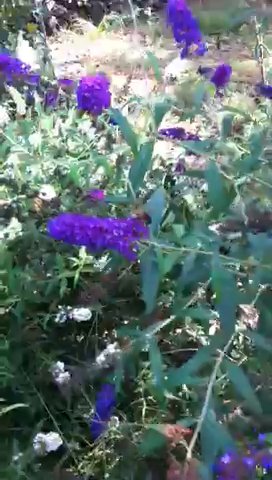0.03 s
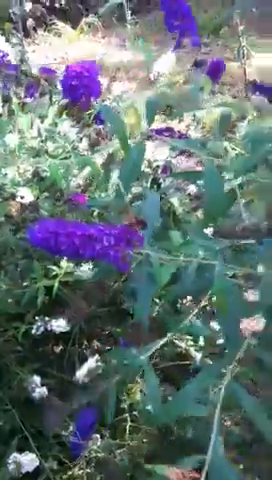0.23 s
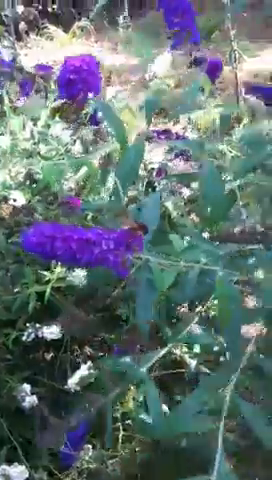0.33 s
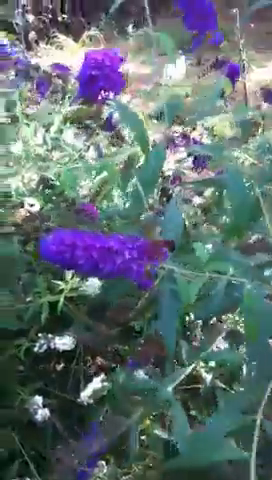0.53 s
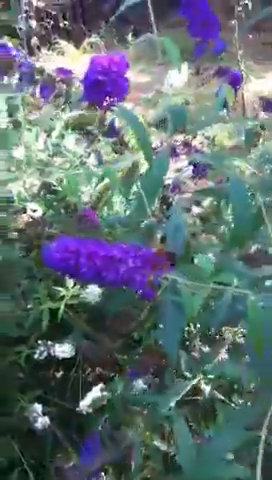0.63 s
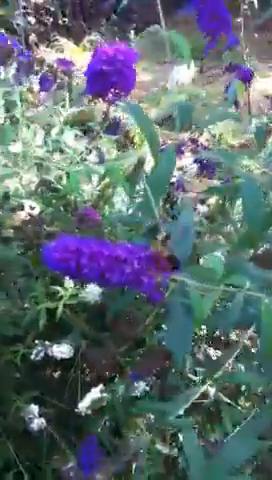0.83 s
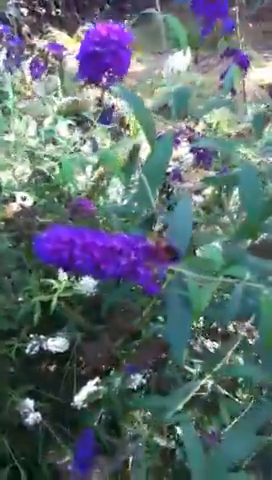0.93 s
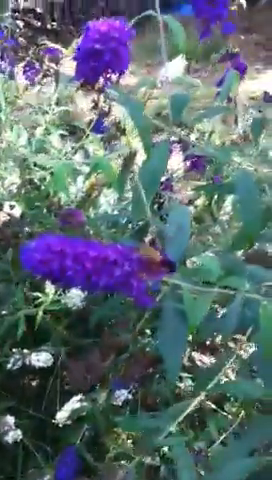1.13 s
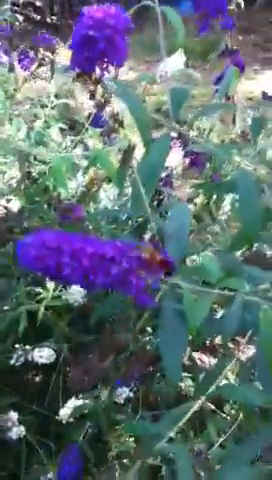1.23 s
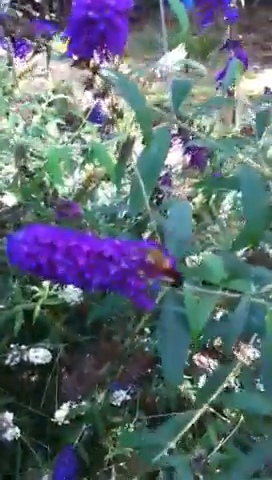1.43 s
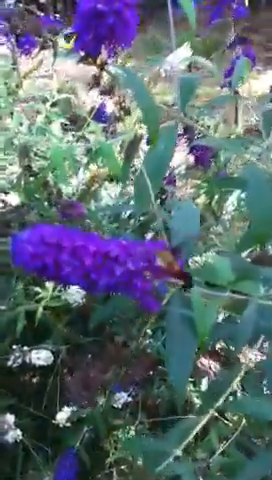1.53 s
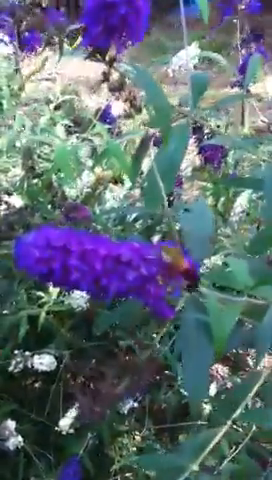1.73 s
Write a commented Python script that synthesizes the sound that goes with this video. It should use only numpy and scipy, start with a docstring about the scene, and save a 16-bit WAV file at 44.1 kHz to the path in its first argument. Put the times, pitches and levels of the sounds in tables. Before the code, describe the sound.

Fingers knock three times on a hand-held phone, short dull thumps close on the microphone, the last the loudest. A faint dry tick like a twig follows, over the steady hiss and low distant wash of a quiet garden.

```python
"""Three knocks of fingers on a hand-held phone, each a short falling 'tup' with a faint rattle after it.
A knock runs through the case as a bending wave whose treble arrives ahead of its bass, so the pitch
falls. Then comes a faint, dry tick like a twig: a few briefly ringing tones with a short, bright
scrape. Behind it all lies a quiet garden: a low, distant outdoor wash under an even hiss."""
import sys
import numpy as np
from scipy import signal
from scipy.fft import rfft, irfft
from scipy.io import wavfile
from scipy.ndimage import uniform_filter1d

SR = 44100
rng = np.random.default_rng(int(sys.argv[2]) if len(sys.argv) > 2 else 0)


def file_out(sig):
    """Save sig as 16-bit WAV at sys.argv[1]."""
    # one column per channel
    cols = np.atleast_2d(sig).T
    # limit, then scale
    lim = np.clip(cols, -1, 1)
    pcm = np.round(lim * 32767).astype(np.int16)
    wavfile.write(sys.argv[1], SR, pcm)


N = 79380

# how well the case passes each pitch to the microphone: f/Hz, level/dB
CASE_TONE = [(40, -28), (135, -21), (230, -0.5), (370, 3), (455, -7), (520, -5), (610, -6.5), (760, 1),
             (1050, -0.5), (1420, 2), (1680, 0), (1880, -9.5), (2120, -4), (2380, -13), (2560, -25),
             (2780, -12), (3200, -14), (3800, -29), (6000, -44), (12000, -79)]
def knock(strength_db, bright_db, lag_ms, size=4096):
    """One blow bends the case; a wave four times as high crosses it in half the time."""
    hz = abs(np.fft.fftfreq(size, 1 / SR))
    khz = hz / 1000
    tone_db = read(CASE_TONE, hz) + bright_db * np.log2(np.maximum(khz, .2))
    case = np.exp(np.conj(signal.hilbert(np.log(amp(tone_db)))))  # rings only after the blow
    travel = np.exp(-4j * np.pi * lag_ms * np.sqrt(khz))
    wave = irfft((case * travel)[:size // 2 + 1])[:size // 2]
    return amp(strength_db) * wave / np.linalg.norm(wave)


# blows on the case (the third is a light rebound):
# t/s, level/dB, brightness/(dB per octave), travel time at 1 kHz/ms
BLOWS = [(0.1079, -10.8, 0.7, 2.11), (0.2489, -5, -0.56, 2.02), (0.2579, -26.5, -2, 2.03),
         (0.3096, -0.5, 1, 2.027)]
def finger_knocks():
    """Fingers knock the case, and a rattle follows each blow."""
    out = np.zeros(N)
    for start, strength_db, bright_db, lag_ms in BLOWS:
        wave = knock(strength_db, bright_db, lag_ms)
        add(out, start, wave)
        add(out, start + 0.009, rattle(wave))
    return out


def rattle(wave, relative_db=-18.5, fade_s=0.095, top_hz=890, size=5000):
    """Faint, dull repeats of a knock that die away by 60 dB in fade_s."""
    t = np.arange(size) / SR
    clicks = rng.choice([-1., 1.], size) * (rng.random(size) < 2000 / SR)  # about 2000 a second
    repeats = signal.fftconvolve(wave, clicks * amp(-60 * t / fade_s))
    tail = signal.sosfilt(signal.butter(2, top_hz, fs=SR, output="sos"), repeats)
    return amp(relative_db) * tail * np.linalg.norm(wave) / np.linalg.norm(tail)


# the tones that ring in the tick: f/Hz, level/dB, time to fade by 60 dB/s, delay into the tick/s
TICK_TONES = [(2240, -34.5, 0.0075, 0.00011), (1550, -38, 0.0057, 0.002), (900, -38.5, 0.009, 0.00243),
              (450, -39, 0.015, 0.0016)]
def twig_tick(start_s=0.736, rise_s=0.0006, low_hz=220, size=2000):
    """A faint, dry tick like a twig: a few briefly ringing tones with a short, bright scrape."""
    out = np.zeros(N)
    t = np.arange(size) / SR
    rise = np.minimum(t / rise_s, 1)
    bass_cut = signal.butter(2, low_hz, "highpass", fs=SR, output="sos")
    for hz, db, fade_s, delay in TICK_TONES:
        ring = rise * amp(db - 60 * t / fade_s) * np.sin(2 * np.pi * hz * t)
        add(out, start_s + delay, signal.sosfilt(bass_cut, ring))
    add(out, start_s, rise * scrape(t))
    return out


def scrape(t, level_db=-45.5, fade_s=0.022, band_hz=(1700, 5500)):
    """The short, bright puff of noise at the start of the tick."""
    band = signal.butter(2, band_hz, "bandpass", fs=SR, output="sos")
    puff = unit(signal.sosfilt(band, rng.standard_normal(len(t))))
    return amp(level_db - 60 * t / fade_s) * puff


# how strong the wash is at each pitch: f/Hz, level/dB
WASH_TONE = [(20, -51), (45, -34), (68, -24.5), (88, -7.5), (115, -1.5), (170, -1), (250, 1.5), (400, -0.5),
             (490, -1), (600, -4.5), (800, -1.5), (950, -2), (1150, -6), (1500, -9.5), (2050, -9.5),
             (2700, -19), (5000, -26.5), (15000, -25.5)]
# how the wash swells and sinks: t/s, level/dB
WASH_SWELL = [(0.1, 1), (0.4, 0.5), (0.68, 1.3), (0.8, -0.5), (0.95, 0.5), (1.2, 0.1), (1.32, 1.8),
              (1.48, -0.5), (1.6, -0.5), (1.68, 1.6), (1.8, 0.6)]
def garden_wash(level_db=-54):
    """The low wash of distant outdoor noise, swelling gently."""
    swell_db = np.interp(np.arange(N) / SR, *np.transpose(WASH_SWELL))
    return amp(level_db + swell_db) * shaped_noise(WASH_TONE)


# how strong the hiss is at each pitch: f/Hz, level/dB
HISS_TONE = [(100, -11), (1500, 2), (3500, 3), (6000, 0.5), (9500, -1), (12500, -3.5), (15800, -9.5)]
def hiss(level_db=-59):
    """Steady, even hiss."""
    return amp(level_db) * shaped_noise(HISS_TONE)


def shaped_noise(tone, drift_db=1):
    """Noise with the given tone, in which patches of pitch drift a little louder and softer."""
    frames = dict(nperseg=512, noverlap=384)
    grid = signal.stft(rng.standard_normal(N), **frames)[2].T  # time down, pitch across
    drift = uniform_filter1d(rng.standard_normal(grid.shape), size=20, axis=0)
    patches = unit(uniform_filter1d(drift, size=5, axis=1))
    noise = signal.istft((grid * amp(drift_db * patches)).T, **frames)[1][:N]
    gain = amp(read(tone, np.fft.rfftfreq(N, 1 / SR)))
    return unit(irfft(rfft(noise) * gain, N))


def amp(db):
    """Turns decibels into a multiplier."""
    return 10 ** (np.asarray(db) / 20)


def unit(x):
    """Scales a signal to an average (rms) size of 1."""
    return x / np.sqrt(np.mean(x ** 2) + 1e-20)


def read(tone, hz):
    """Looks up a table's level at any pitch, with octaves evenly spaced."""
    f, db = np.transpose(tone)
    return np.interp(np.log(hz + 1), np.log(f + 1), db)


def add(mix, start_s, sound):
    """Mixes a sound in at the given time."""
    part = mix[round(start_s * SR):][:len(sound)]
    part += sound[:len(part)]


def scene():
    """Everything reaches one microphone, so both ears hear the same."""
    mono = garden_wash() + finger_knocks() + twig_tick() + hiss()
    return np.array([mono, mono])


def record(dry, open_s=0.0842, fade_in_s=0.004, top_hz=15950):
    """The microphone opens just after the start, and the very highest treble is cut."""
    fade_in = np.clip((np.arange(N) / SR - open_s) / fade_in_s + .5, 0, 1)
    treble_cut = signal.firwin(1023, top_hz, window=("kaiser", 9), fs=SR)
    return signal.oaconvolve(dry * fade_in, treble_cut[None], "same")


dry = scene()
out = record(dry)
file_out(out)
```